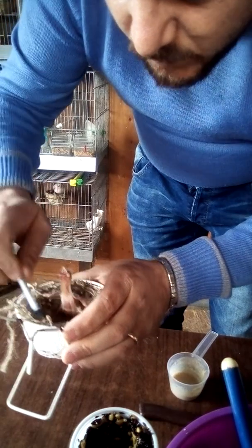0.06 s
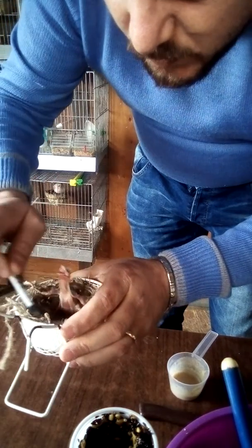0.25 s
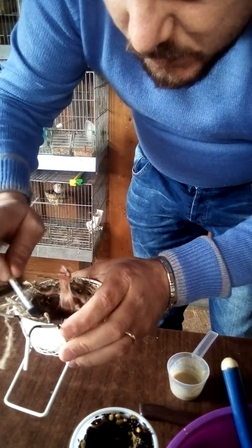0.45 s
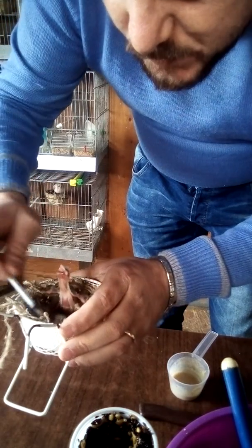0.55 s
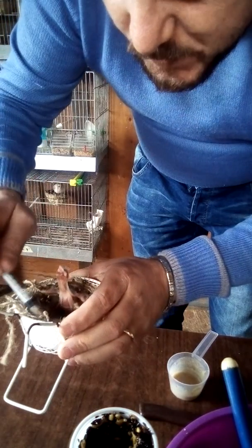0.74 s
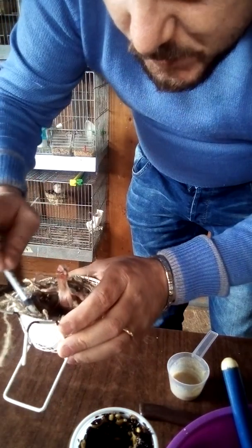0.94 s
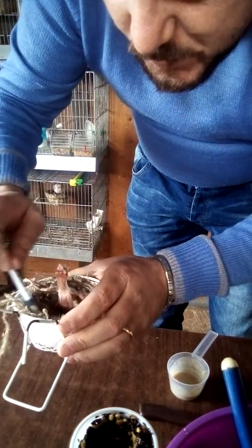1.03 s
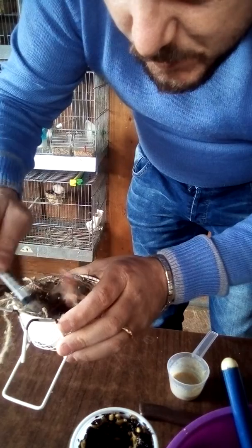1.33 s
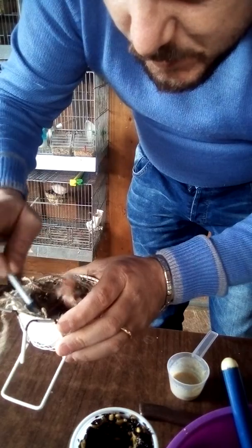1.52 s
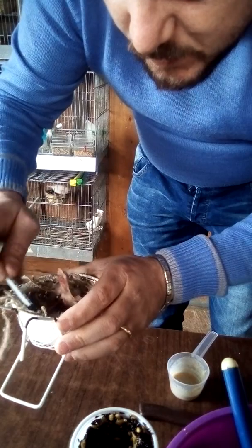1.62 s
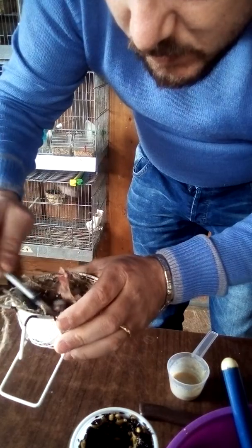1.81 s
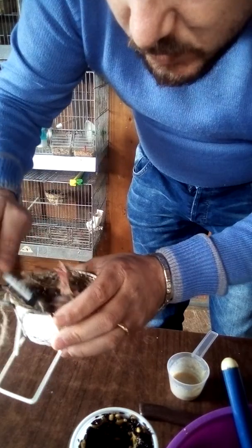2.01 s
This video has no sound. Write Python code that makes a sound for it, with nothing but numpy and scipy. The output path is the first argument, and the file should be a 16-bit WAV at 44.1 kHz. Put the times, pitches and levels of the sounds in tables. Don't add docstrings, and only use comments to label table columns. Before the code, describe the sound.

A nestling gives three loud rapid cheeps close up; another answers farther away with a squeaky break and raspy repeated cheeps, while an adult bird whistles briefly. Soft nest rustles, low room noise and light hiss.

```python
import sys
import numpy as np
from scipy import signal
from scipy.fft import rfft, irfft
from scipy.io import wavfile
from scipy.ndimage import uniform_filter1d

SR = 44100
rng = np.random.default_rng(int(sys.argv[2]) if len(sys.argv) > 2 else 0)


def amplitude_ratio(level_db):
    exponent = np.asarray(level_db, float) / 20
    return 10 ** exponent


def persist_wave(psi):
    counts = np.round(np.clip(psi, -1, 1) * 32767).astype(np.int16)
    wavfile.write(sys.argv[1], SR, np.atleast_2d(counts).T)


N = 90404

# frequency [Hz], level [dB].
ROOM_NOISE = [(18, -54), (30, -21), (119, -13.5), (428, -23.5), (514, -6.5), (2400, -33.5), (3120, -69.5),
              (5280, -120)]
# frequency [Hz], level [dB].
CHATTER = [(2500, -11.5), (3600, -4.5), (4600, 0), (5600, -7.5), (6500, -4.5), (7200, -19.5), (9000, -38.5)]
# start [s], length [s], level [dB], centre [Hz], width [Hz].
RUSTLES = [(0.021, 0.04, -54, 177, 230), (.42, 0.27, -53.5, 664, 750), (.6, 0.065, -51.5, 351, 58),
           (.48, 0.063, -54, 228.3, 24), (.74, 0.16, -50.5, 710, 810), (0.058, 0.028, -54, 76, 53),
           (.75, 0.077, -56.5, 339, 71), (.9, .22, -55.5, 386, 390), (1.19, 0.26, -56.5, 640, 900),
           (1.5, 0.069, -50.5, 700, 1220), (1.52, 0.053, -53, 94, 69), (1.5, 0.12, -54, 1500, 1200),
           (1.7, 0.17, -58, 121, 154), (0.88, 0.06, -58, 1600, 100), (0.069, 0.051, -58, 100, 63)]
# start [s], length [s], level [dB], pitch [Hz], fall [Hz].
ADULT_NOTES = [
    (1.215, .05, -44, 2682, 55.5),
    (1.272, 0.038, -43, 2620, 43.5),
    (1.712, 0.026, -41, 3460, 755),
    (1.769, .017, -34.5, 3620, 500),
    (1.786, 0.014, -42.5, 2700, 720),
    (0.511, .04, -51, 2960, 50),
    (1.91, 0.11, -66, 3690, -100),
]
ADULT_OCTAVE_DB = [8.5, 9, -8, -28, 4.5, -42, -27]
ADULT_JITTER = [.03, .02, 0.0057, .015, 0.014, 0.031, 0.02]
# start [s], length [s], level [dB], top pitch [Hz], breath [dB].
FAR = [
    (0.547, 0.15, -42.5, 3900, 6),
    (0.713, 0.12, -37.5, 3630, -0.5),
    (0.881, 0.1, -37, 3616, -3),
    (1.017, 0.13, -38.5, 3707, 0),
    (1.191, .12, -38, 3666, -5.5),
    (1.347, .095, -39, 3389, -5),
    (1.468, 0.089, -46.5, 3280, 6),
    (1.654, 0.088, -56, 4874, 2),
]
# frequency [Hz], level [dB].
BREATH = [(2300, -35.5), (3100, -12), (3700, 6), (4600, 4.5), (5400, -4.5), (6600, -9.5), (7700, -33.5),
          (11000, -59.5)]
# start [s], length [s], level [dB], settled pitch [Hz], rise time [s].
NEAR = [
    (0.218, .12, -19.5, 3657, 0.014),
    (0.335, 0.072, -18.5, 4380, .007),
    (0.414, 0.057, -17.5, 4207, .007),
]
# second membrane offset [Hz], its level [dB], its delay [s],
# climb [Hz/s], jitter [0-1], rasp [dB].
NEAR_VOICE = [
    (599.5, -1, 0.02, 3200, 0.01, -25),
    (-330, -5, 0.021, 120, 0.02, -15.5),
    (-450, -9.5, 0.014, 89, .014, -16.5),
]
NEAR_HOLD_S = [0.0034, .011, .011]
# frequency [Hz], level [dB].
RASP = [(2000, -49.5), (2500, -20.5), (3300, -8), (4200, -6.5), (5000, -6.5), (5700, -34.5), (7000, -47),
        (12000, -77)]


def evened(x):
    return x / np.sqrt(np.mean(x ** 2) + 1e-20)


def shaped(points, count):
    f, db = np.transpose(points)
    hz = np.fft.rfftfreq(count, 1 / SR)
    gain = amplitude_ratio(np.interp(np.log(hz + 1), np.log(f + 1), db))
    return evened(irfft(rfft(rng.standard_normal(count)) * gain, count))


def add(mix, s, sound):
    part = mix[max(round(s * SR), 0):][:len(sound)]
    part += sound[:len(part)]


def resonate(x, hz, width_hz):
    turn = np.exp(2j * np.pi * hz * np.arange(len(x)) / SR)
    r = np.exp(-np.pi * width_hz / SR)
    return 2 * (turn * signal.lfilter([1 - r], [1, -r], x / turn)).real


def wobble(count, smooth_s):
    noise = rng.standard_normal(8192)
    r = np.exp(-1 / (smooth_s * SR))
    return evened(signal.lfilter([1], [1, -2 * r, r * r], noise))[:count]


def whistle(hz, jitter):
    return 2 * np.pi * np.cumsum(hz * (1 + jitter * wobble(len(hz), 0.00059))) / SR


def room_tone():
    chatter = amplitude_ratio(-69.5) * shaped([(500, -72), *CHATTER, (12000, -65.5)], N)
    steady = amplitude_ratio(-59.5) * shaped(ROOM_NOISE, N) + chatter
    z = signal.stft(steady, SR, nperseg=1024, noverlap=768)[2]
    patches = uniform_filter1d(rng.standard_normal(z.shape), size=5, axis=0)
    patches = evened(uniform_filter1d(patches, size=10, axis=1))
    patchy_db = 4.5
    tone = signal.istft(z * amplitude_ratio(patchy_db * patches), SR, nperseg=1024, noverlap=768)[1][:N]
    hiss = shaped([(100, 0), (13500, 0.1), (14800, 9), (22000, 9)], N)
    return tone + amplitude_ratio(-80) * hiss


def room(x):
    t60_s, delay_s = 0.28, 0.004
    at = np.arange(0, SR // 2, 20) + rng.integers(0, 20, SR // 40 + 1)
    decay = amplitude_ratio(-60 * at / SR / t60_s) * (at > delay_s * SR)
    taps = np.zeros(SR // 2 + 40)
    taps[at] = rng.choice([-1., 1.], len(at)) * decay
    return signal.fftconvolve(x, taps / np.linalg.norm(taps))[:N]


def rustle(start, length, db, hz, width_hz):
    t = np.arange(0, length + 0.09, 1 / SR)
    flutter_db = 1.3 * np.resize(wobble(8192, 0.0063), len(t))
    puff = rng.standard_normal(16384)[:len(t)] * amplitude_ratio(flutter_db)
    edge = np.clip(t / 0.0077, 0, 1) * amplitude_ratio(-250 * np.maximum(t - length, 0))
    ringing = resonate(resonate(puff, hz, width_hz), hz, width_hz)
    return start, amplitude_ratio(db) * edge * evened(ringing)


def adult_note(start, length, db, top_hz, fall_hz, octave_db, jitter):
    t = np.arange(0, length, 1 / SR)
    hz = top_hz - fall_hz * (t / length) ** 1.3
    phase = whistle(hz * (1 + jitter * wobble(len(t), 0.0018)), jitter)
    edge_s = 0.0025
    edge = np.clip(np.minimum(t, length - t) / edge_s, 0, 1)
    return start, amplitude_ratio(db) * edge * (np.cos(phase) + amplitude_ratio(octave_db) * np.cos(2 * phase))


def far_cheep(start, length, db, top_hz, breath_db):
    jitter, breath_hz = 0.011, 3600
    t = np.arange(0, length, 1 / SR)
    arch = np.sin(np.pi * (t / length) ** 0.9)
    hz = top_hz * (1 - 0.15 * (1 - arch))
    upper_hz = top_hz + 621 + 0.402 * (hz - top_hz)
    lower = np.cos(whistle(hz, jitter)) * arch ** 0.35
    upper = amplitude_ratio(-4) * arch ** 1.5 * np.cos(whistle(upper_hz, jitter))
    slide_hz = 1.5 * (hz - top_hz) + 0.5 * (top_hz - breath_hz)
    slide = np.exp(2j * np.pi * np.cumsum(slide_hz) / SR)
    breath = (signal.hilbert(shaped(BREATH, 8192))[:len(t)] * slide).real
    effort = amplitude_ratio(db + 2.5 * wobble(len(t), 0.0034))
    return start, effort * (lower + upper + amplitude_ratio(breath_db) * arch ** 0.73 * breath)


def squeal():
    start, length, from_hz, to_hz = 0.57, 0.069, 6000, 5070
    u = np.arange(0, length, 1 / SR) / length
    hz = to_hz - (to_hz - from_hz) * (1 - np.minimum(u / 0.45, 1)) ** 1.56
    return start, amplitude_ratio(-34.5) * np.sin(np.pi * u) ** 0.6 * np.cos(whistle(hz, 0.025))


def near_cheep(start, length, db, top_hz, rise, second_hz, second_db, delay, climb_hz_per_s, jitter,
               rasp_db, hold):
    start_hz, overtone_edge_hz = 2583, 2726
    attack_s, release_s, soft_db = 0.019, 0.012, -21.5
    t = np.arange(0, length, 1 / SR)
    late = np.maximum(t - hold, 0)
    hz = top_hz - (top_hz - start_hz) * np.exp(-late / rise) + climb_hz_per_s * np.minimum(t, 0.08)
    hz = hz * (1 + 1.5 * jitter * wobble(len(t), 0.003))
    phase = whistle(hz, jitter)
    first = np.cos(phase)
    second_swell = np.clip((t - delay) / 0.022, 0, 1)
    second = amplitude_ratio(second_db) * second_swell * np.cos(whistle(hz + second_hz, jitter))
    early = amplitude_ratio(8) * np.clip((overtone_edge_hz + 200 - hz) / 200, 0, 1) * np.cos(2 * phase)
    pair = (first + second) ** 2
    octaves = amplitude_ratio(-45) * (pair - uniform_filter1d(uniform_filter1d(pair, size=9), size=11))
    rasp = amplitude_ratio(rasp_db) * shaped(RASP, 8192)[:len(t)]
    voice = first + second + early + octaves + rasp
    effort_db = soft_db * np.clip(1 - late / attack_s, 0, 1) + 150 * jitter * wobble(len(t), 0.0019)
    edge = np.clip(np.minimum(t, length - t) / release_s, 0, 1)
    return start, amplitude_ratio(db + effort_db) * edge * voice


def scene():
    near, far, low = np.zeros((3, N))
    for row in RUSTLES:
        add(low, *rustle(*row))
    for row, octave_db, jitter in zip(ADULT_NOTES, ADULT_OCTAVE_DB, ADULT_JITTER):
        add(far, *adult_note(*row, octave_db, jitter))
    for row in FAR:
        add(far, *far_cheep(*row))
    add(far, *squeal())
    for row, voice, hold in zip(NEAR, NEAR_VOICE, NEAR_HOLD_S):
        add(near, *near_cheep(*row, *voice, hold))
    reflections = room(amplitude_ratio(-3) * near + amplitude_ratio(0.5) * far)
    return (near + far + reflections + low + room_tone())[None]


def band_limit(x):
    return signal.sosfilt(signal.butter(12, 15840, fs=SR, output="sos"), x)


def record(dry):
    return band_limit(dry)


dry = scene()
out = record(dry)
persist_wave(out)
```